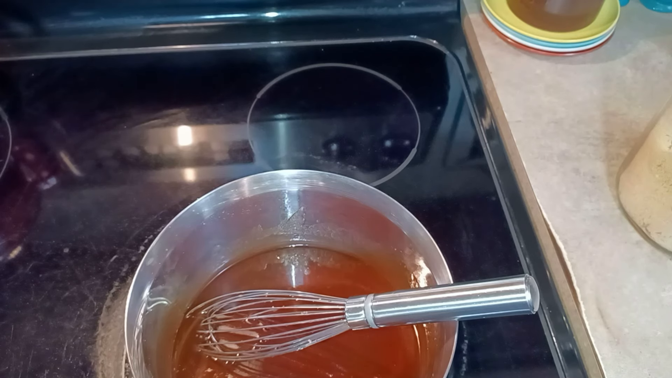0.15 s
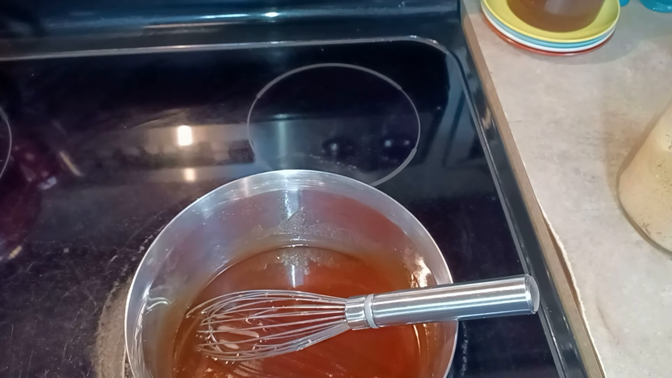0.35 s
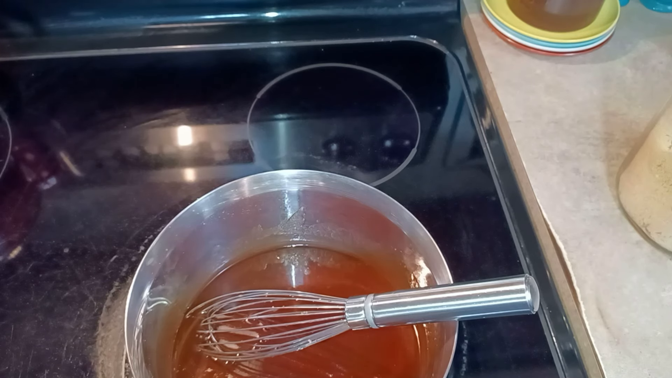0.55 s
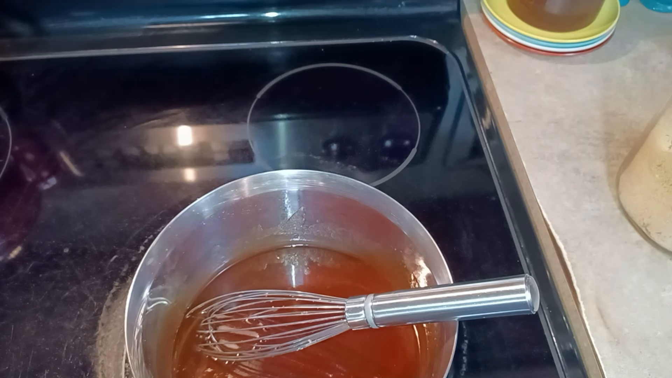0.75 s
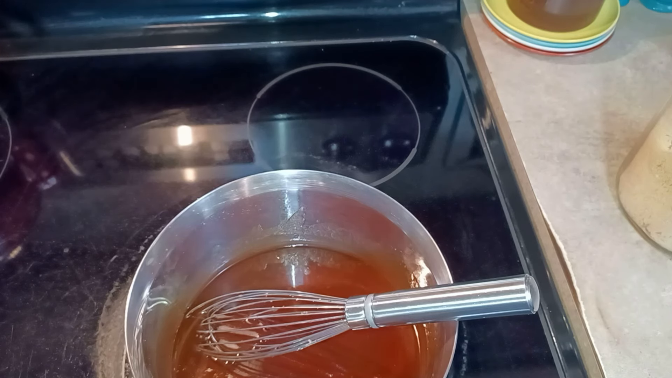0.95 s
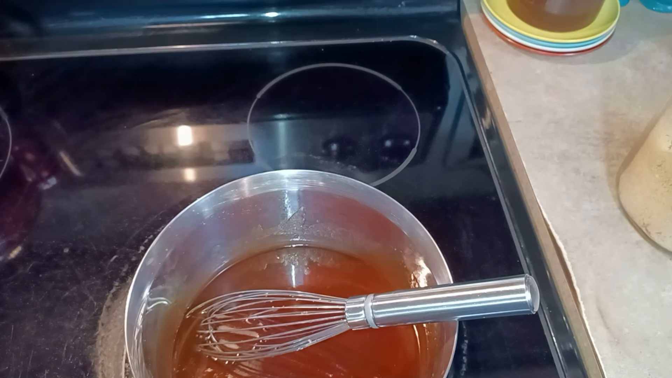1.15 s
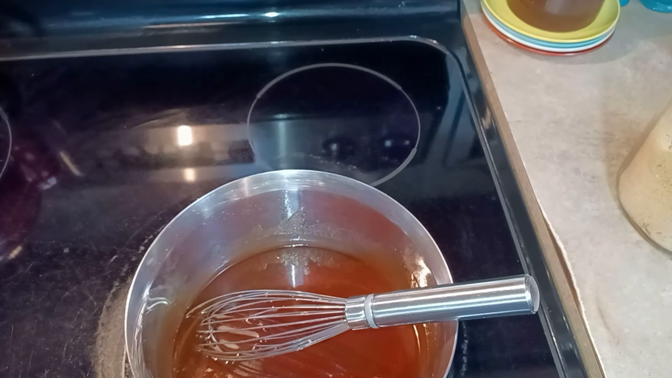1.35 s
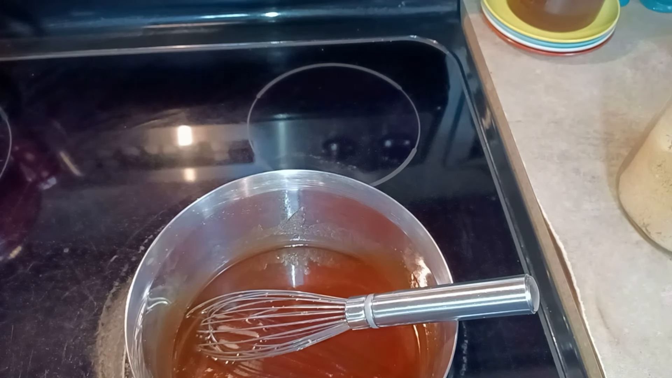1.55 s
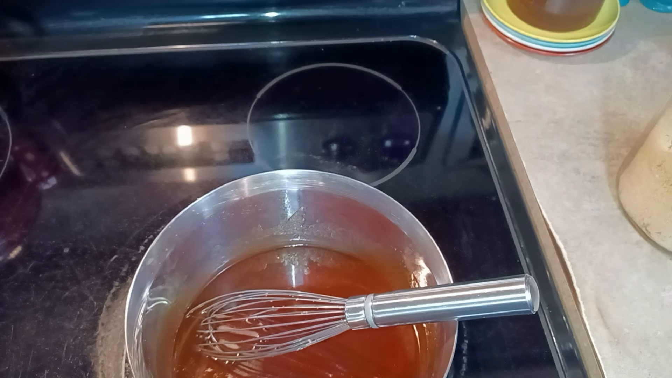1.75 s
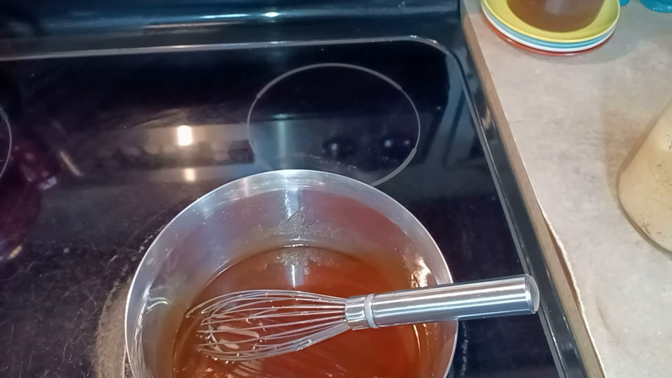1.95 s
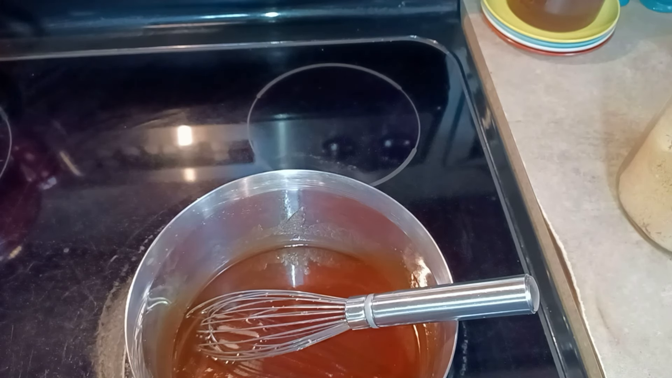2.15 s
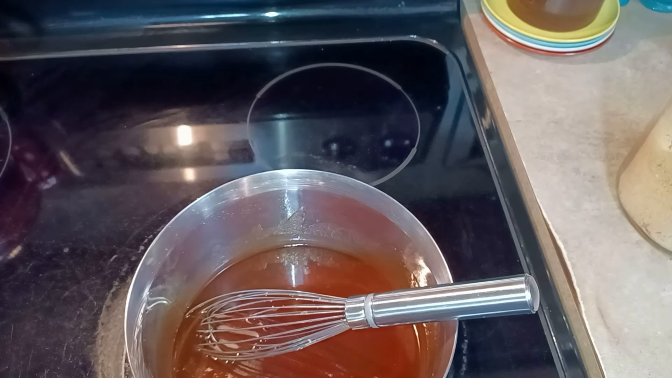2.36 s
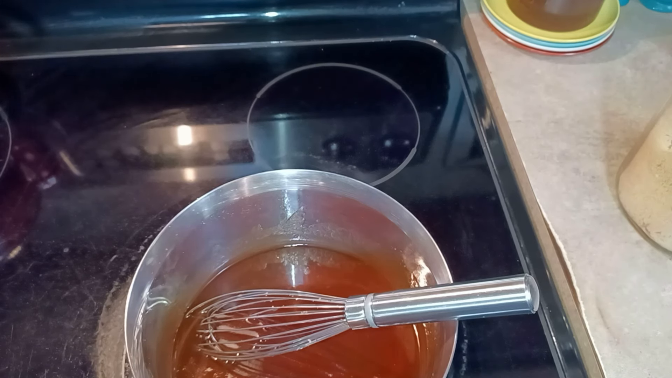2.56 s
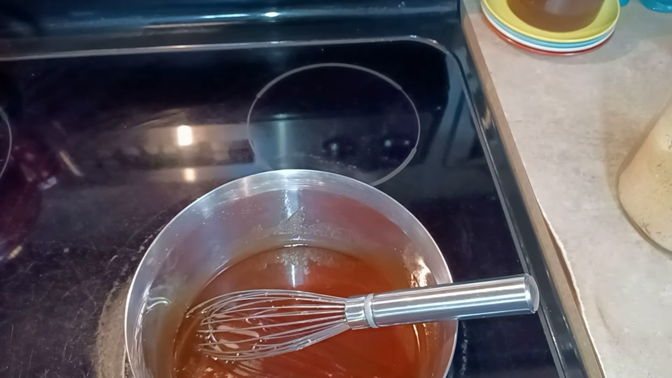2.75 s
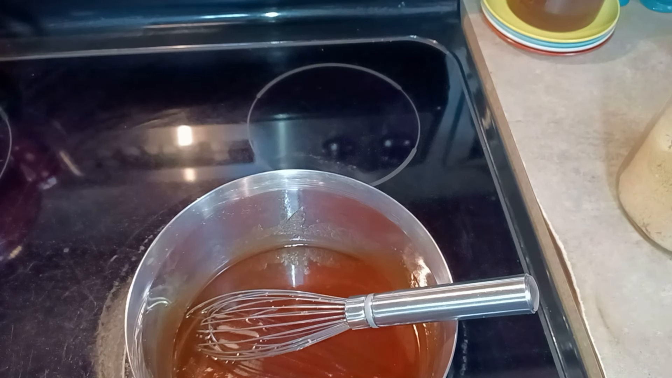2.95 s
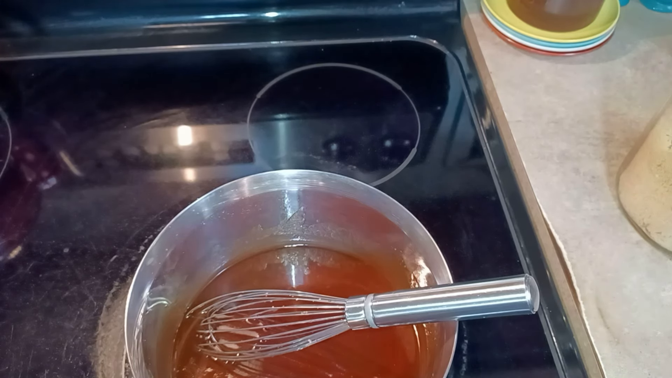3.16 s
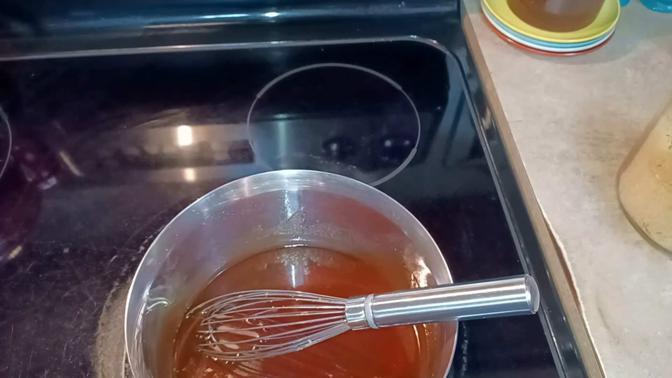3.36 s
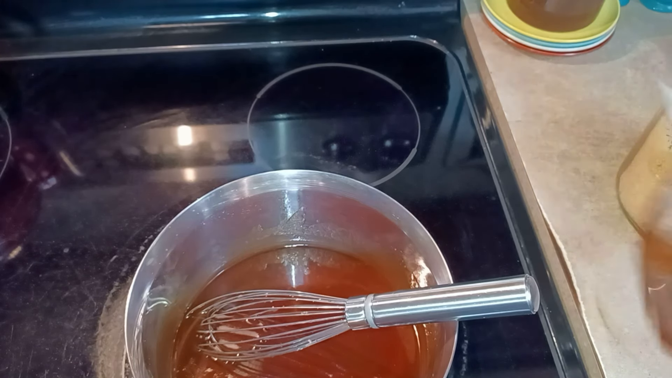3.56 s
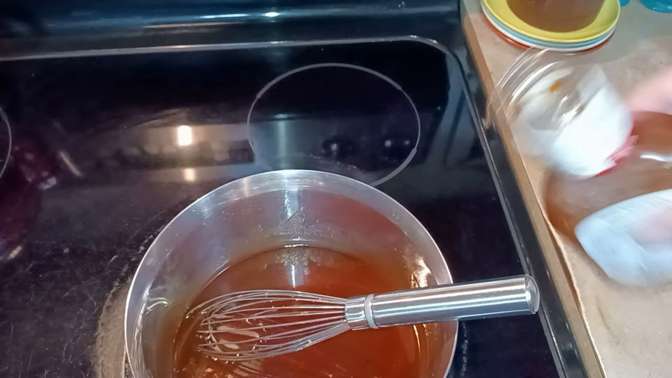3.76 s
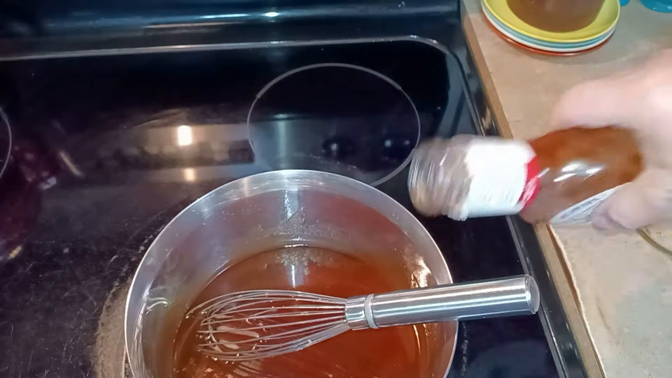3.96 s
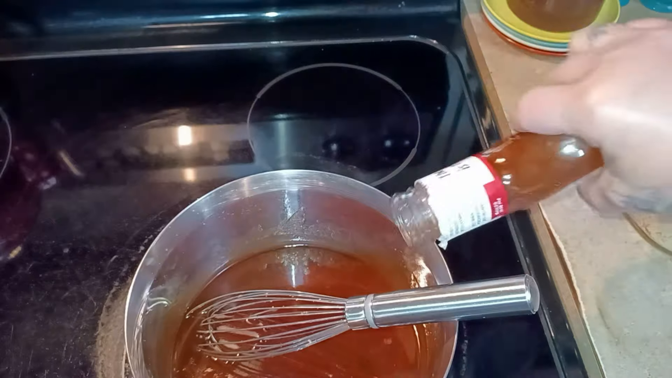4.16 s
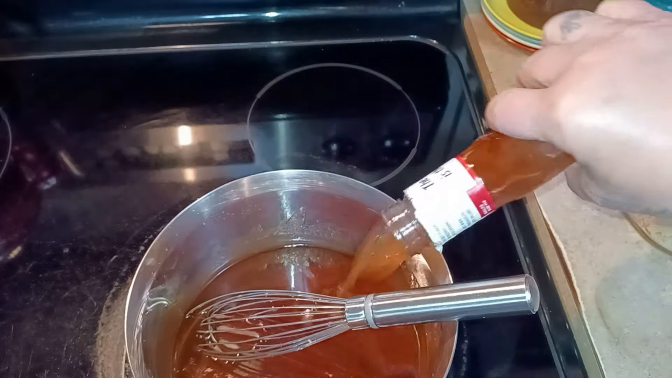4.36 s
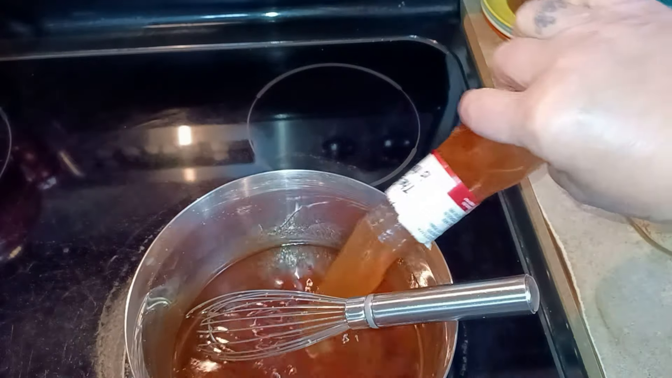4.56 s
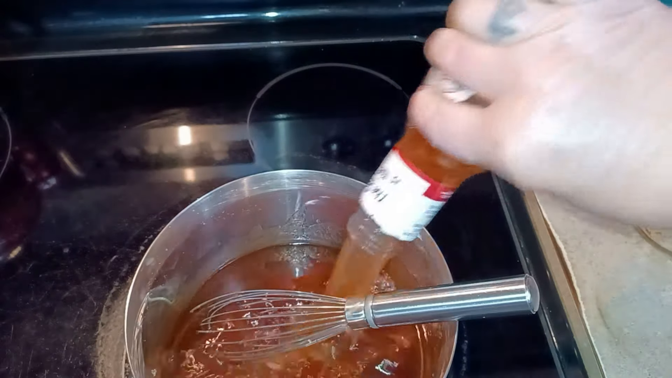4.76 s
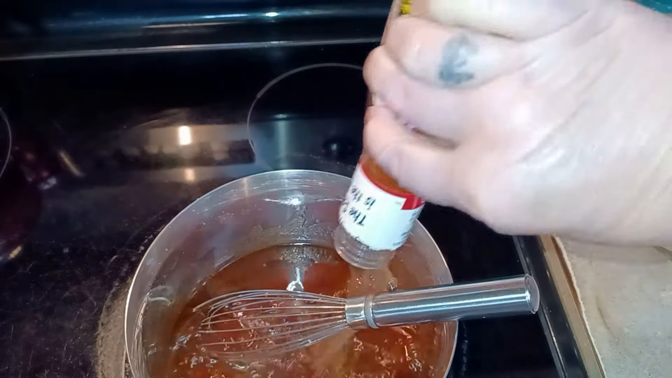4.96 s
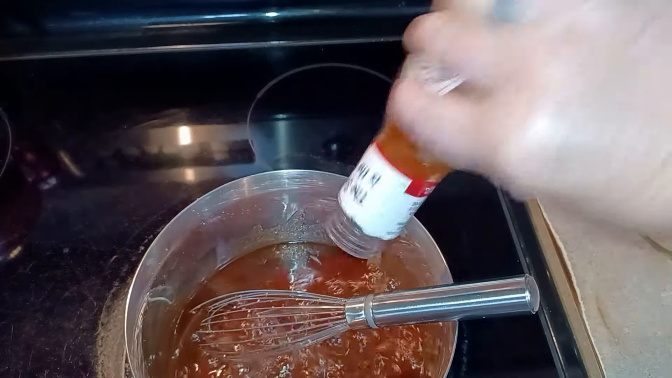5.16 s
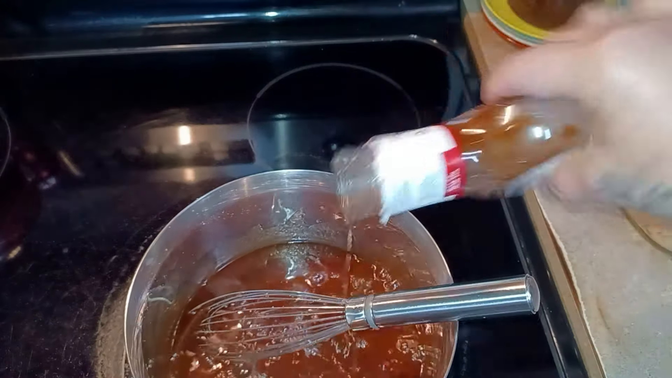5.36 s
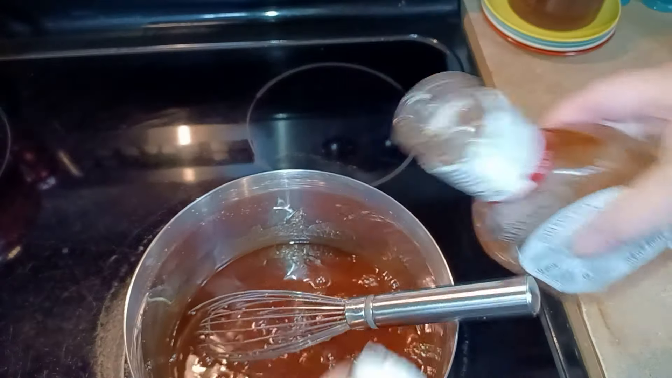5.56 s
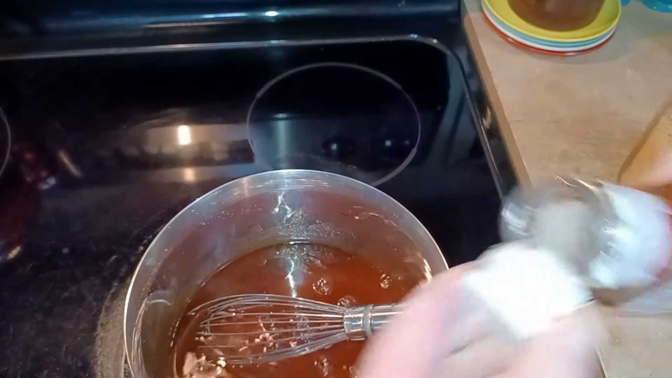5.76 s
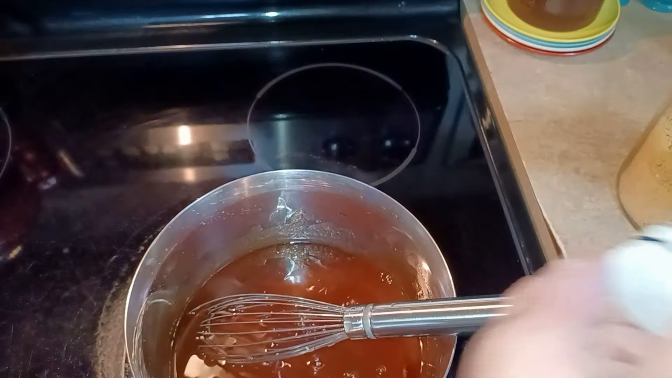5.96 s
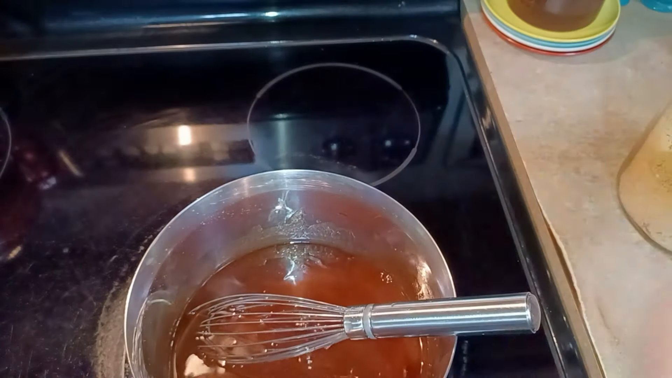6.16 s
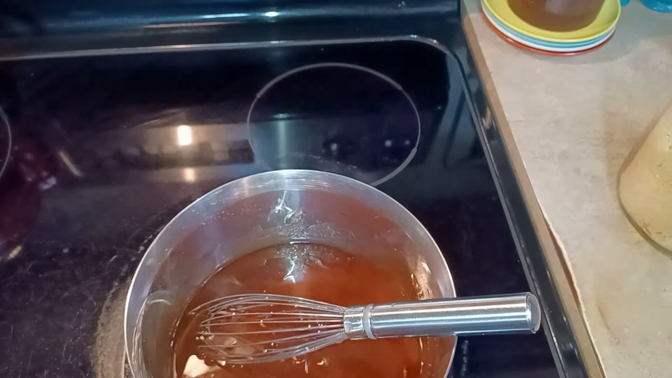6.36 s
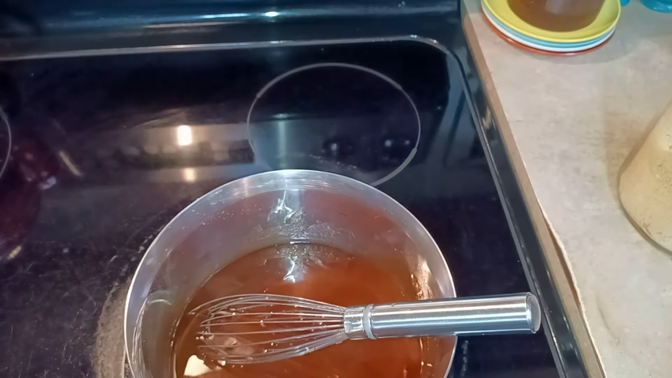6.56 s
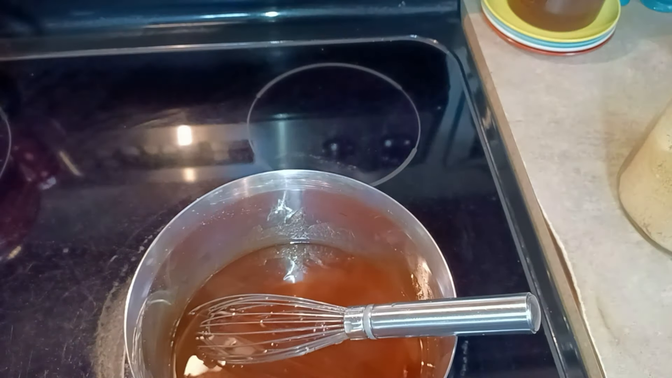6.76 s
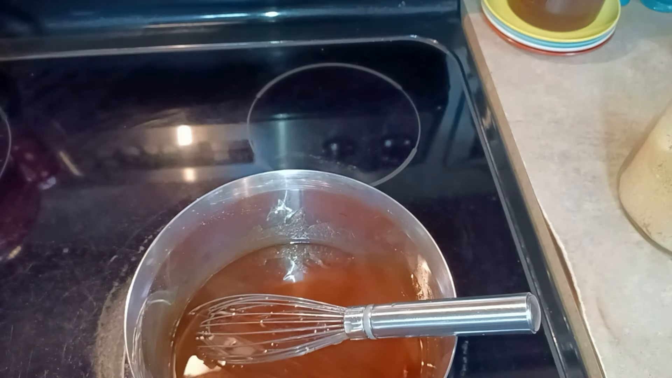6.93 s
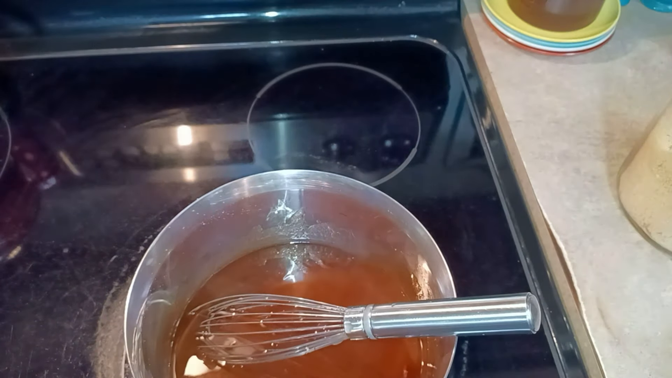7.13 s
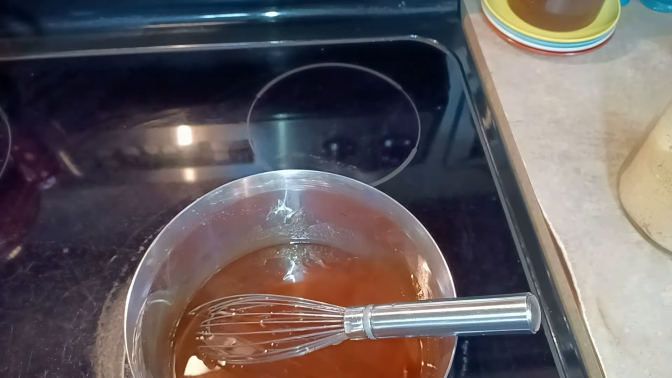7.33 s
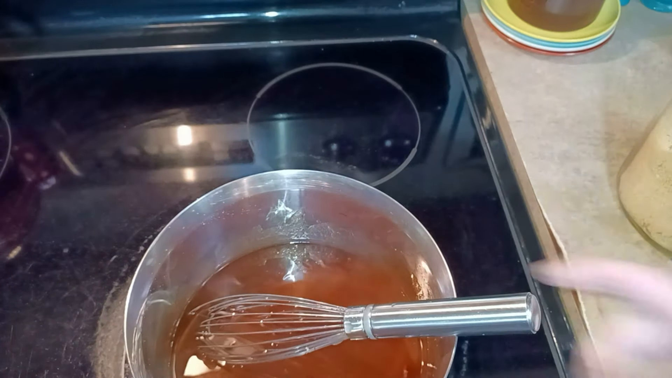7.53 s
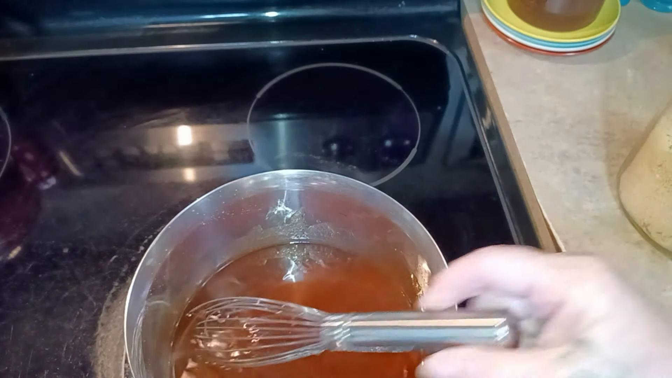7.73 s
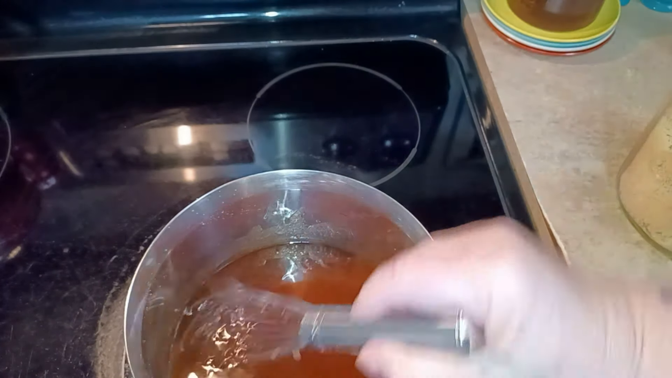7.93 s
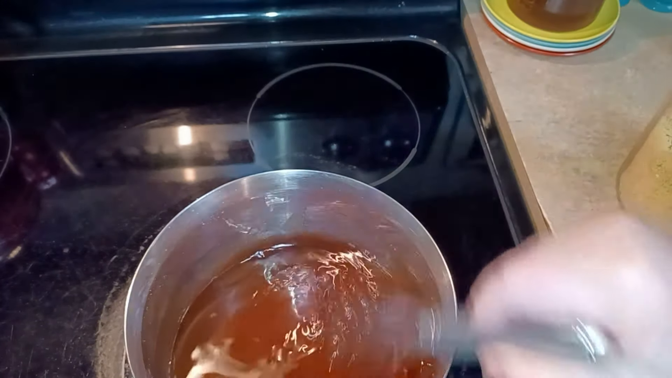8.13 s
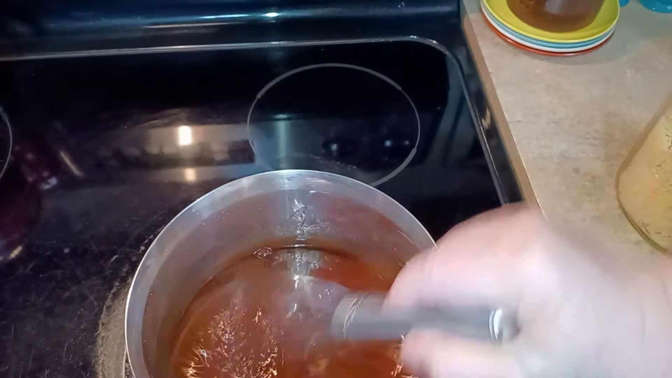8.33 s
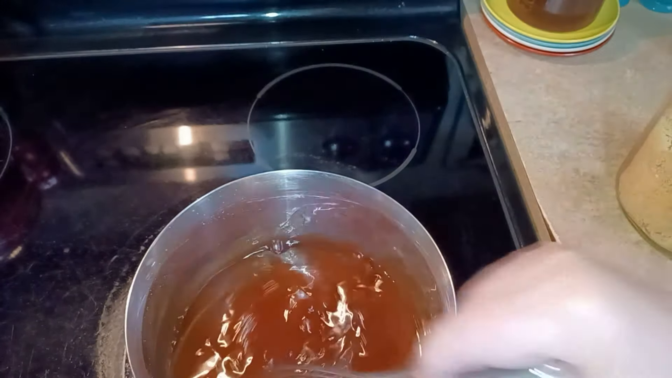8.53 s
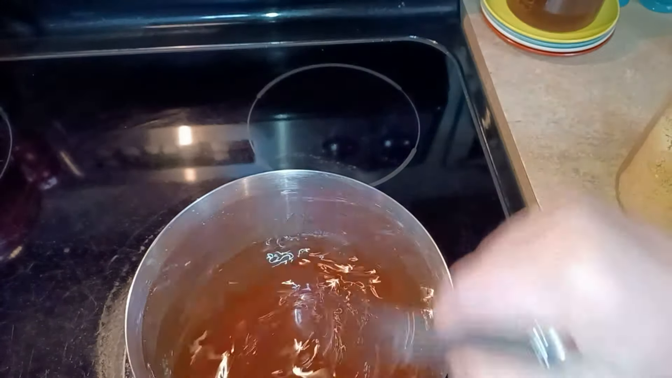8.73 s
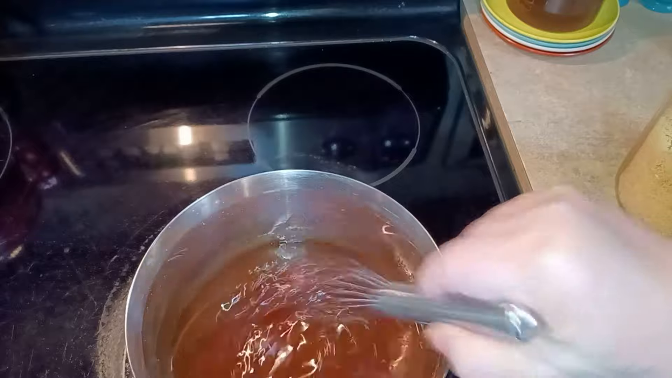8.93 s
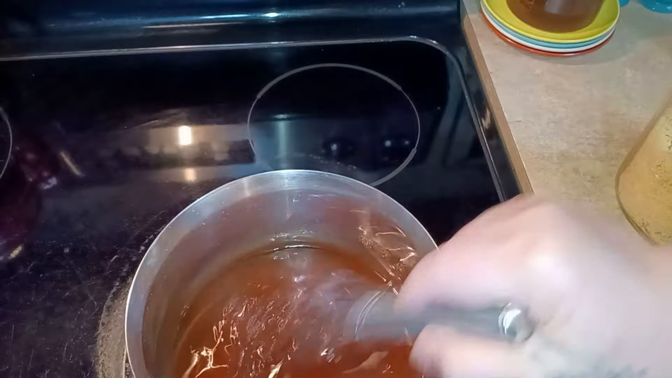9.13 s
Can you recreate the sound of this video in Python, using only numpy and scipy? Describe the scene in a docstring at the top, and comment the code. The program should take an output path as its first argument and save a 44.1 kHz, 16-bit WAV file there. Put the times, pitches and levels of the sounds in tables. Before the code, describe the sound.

A tap fills a plastic bottle, which is shaken and emptied into a steel saucepan, then a whisk stirs thin sauce.

```python
"""Rinsing a sauce bottle in the kitchen

Stereo pair in a small kitchen: sink far off, bottle to the left, steel saucepan straight ahead.
The tap runs, hisses into the plastic bottle, whose air whistles, and is shut off. The bottle is shaken
and emptied into the pan, all slaps and ringing bubbles, then capped and set down with hollow knocks.
A wire whisk starts to beat the thin sauce, steel slipping on steel. An appliance hums throughout."""
import sys
import numpy as np
from scipy import signal
from scipy.io import wavfile
from scipy.ndimage import uniform_filter1d

SR = 44100
rng = np.random.default_rng(int(sys.argv[2]) if len(sys.argv) > 2 else 0)


def master_out(mix):
    """Clip the mix to full scale and print it as 16-bit PCM to the path in sys.argv[1]."""
    frames = np.transpose(np.atleast_2d(mix))
    ceiling = np.clip(frames, -1, 1)
    pcm = np.round(ceiling * 32767).astype(np.int16)
    wavfile.write(sys.argv[1], SR, pcm)


N = 405279

# Levels in all tables are relative; each layer adds its own trim.
# spectrum of the tap's jet striking a surface: (frequency [Hz], level [dB])
JET_SPECTRUM = [(180, -13), (300, -9.5), (546, -11), (790, -16.5), (1400, -8), (2300, -8), (2930, -15),
                (3350, -8), (4600, -7), (5500, -10), (7100, -5), (8500, -9.5), (12300, -6), (15400, -5),
                (16500, -26)]
# liquid slapping the bottle's walls: (time [s], level [dB], main bubble [Hz], spray [dB])
BOTTLE_SLAPS = [(2.674, -37, 1604, -47), (2.742, -34, 1886, -55), (2.81, -40, 3200, -53),
                (2.875, -41, 4130, -36), (2.889, -36, 1600, -32.5), (2.923, -27.5, 1790, -47),
                (2.975, -32, 1720, -57), (3.02, -29.5, 1600, -36), (3.038, -34, 2200, -41),
                (3.099, -35, 3790, -48), (3.107, -31.5, 2310, -30), (3.129, -34, 2400, -45),
                (3.186, -40, 1620, -30.5), (3.2131, -24.5, 2060, -38), (3.223, -34, 2060, -45),
                (3.246, -29, 1450, -45), (3.261, -32.5, 1940, -28.5), (3.304, -29.5, 5200, -39),
                (3.324, -25.5, 1910, -27.5), (3.359, -27, 2200, -27.5), (3.392, -27, 1970, -33),
                (3.4131, -19.5, 2970, -20.5), (3.425, -26, 2330, -32), (3.469, -29, 1830, -29),
                (3.487, -26.5, 2960, -46), (3.505, -32.5, 2090, -47), (3.5469, -29, 1970, -28.5),
                (3.56, -32.5, 2390, -23), (3.647, -36, 4350, -35), (3.668, -28, 2540, -26),
                (3.683, -30.5, 2110, -42), (3.727, -34, 3200, -23.5), (3.77, -27.5, 1900, -48),
                (3.788, -25, 1470, -47), (3.7969, -20, 1990, -22), (3.819, -30, 1016, -43),
                (3.913, -26.5, 1800, -48), (3.93, -32, 2290, -45), (3.943, -26.5, 1890, -29),
                (3.975, -34, 1940, -47), (4.04, -33, 1490, -41)]
# turns of the whisk, each starting at the pan wall:
# (time [s], clash [dB], decay [s], pan rocking [dB], rocking pitch [Hz], pan ring [dB])
WHISK_STROKES = [(7.983, -32.5, 0.059, -28.5, 146, -59), (8.347, -29, 0.017, -28, 179, -57),
                 (8.6195, -23.5, 0.019, -29, 187, -52), (8.901, -23.5, 0.017, -25.5, 169.6, -41),
                 (9.157, -20.5, 0.026, -22, 159, -35)]


def shaking():
    """Liquid washes to and fro in the bottle and slaps its walls; water gurgles low in sink and bottle."""
    vigour = [(2.05, -66), (2.87, -45), (3.4, -43.5), (3.68, -38.5), (4.1, -60.5), (4.25, -84)]  # force of the shaking: (time [s], level [dB])
    spectrum = [(120, -46), (200, 10.5), (316, -0.5), (456, -2), (509, -18.5), (933, -16.5), (1350, -14),
                (1700, -8.5), (2000, -13.5), (2400, -17.5), (4200, -21.5), (6280, -21), (11100, -23),
                (13100, -21), (16000, -27)]  # liquid heard through plastic: (frequency [Hz], level [dB])
    gurgles = [(0.059, 0.069, 0.037, 0.25, -40.5), (1.369, 0.075, 0.019, 0.11, -37.5),
               (3.897, 0.25, 0.041, 0.11, -48)]  # low bubbling: (time [s], rise [s], hold [s], fall [s], level [dB])
    out = slaps(BOTTLE_SLAPS, spectrum, cycles=6.6, bubble_db=-3, cloud_db=-4, spray_db=-7,
                fizz_db=-11.5, tick_db=-7.5, smack_db=-9, fallback_db=-11.5)
    t, level = follow(vigour)
    add(out, t[0], level * churn(len(t), 299.6, 6110, per_s=1700, crackle_db=2, spectrum=spectrum))
    for row in gurgles:
        t, level = swell(*row)
        add(out, t[0], level * steadied(swarm(len(t), 326, 600, per_s=490, cycles=3, spread_db=3.5)))
    return out


def gulping(closing_db=-5):
    """Air pockets turn over in the bottle and ring low; the slap that closes each adds a higher note."""
    glugs = [(3.033, -18, 281), (3.482, -25, 305), (3.659, -14.5, 300), (3.798, -22, 316),
             (3.817, -24, 340)]  # large air pockets: (time [s], level [dB], pitch [Hz])
    out = np.zeros(N)
    # every slap in the bottle also gulps air
    gulps = [(s, db - 8.5, 324 * rng.uniform(0.704, 1.257)) for s, db, *_ in BOTTLE_SLAPS]
    for s, db, hz in glugs + gulps:
        add(out, s, amp(db) * peaked(bubble(hz, cycles=1.8, rise=0.0049)))
        add(out, s, amp(db + closing_db) * peaked(bubble(hz * 1.49, cycles=1.8, rise=0)))
    return out


def pouring(stream_db=-4, drum_db=-12):
    """The stream drives bubbles into the sauce and drums on the pan; a fine foam is left bursting."""
    flow = [(4.555, -48), (4.61, -51), (4.72, -32), (4.785, -27.5), (4.82, -32.5), (4.97, -33.5),
            (5.04, -35.5), (5.15, -89)]  # stream into the pan: (time [s], level [dB])
    spectrum = [(530, -29), (900, -14), (1220, -5), (1340, -6), (1570, -11), (2170, -2), (4010, -9),
                (4570, 2), (8250, -7.5), (12700, -5), (16000, -17.5)]  # liquid in the open pan: (frequency [Hz], level [dB])
    splashes = [(4.4368, -35, 2550, -41.5), (4.466, -30, 1314, -44), (4.487, -37, 2360, -42),
                (4.579, -34, 1260, -41), (4.597, -26.5, 1560, -33.5), (4.609, -26, 4940, -44),
                (4.6242, -28, 3740, -24.5), (4.64, -29, 2320, -44), (4.655, -30, 535, -44),
                (4.657, -26, 1730, -40), (4.679, -29, 1520, -26), (4.7436, -32, 1950, -25),
                (4.757, -19.5, 2010, -42), (4.7694, -16.5, 1383, -36), (4.7882, -15, 2100, -30.5),
                (4.842, -29, 1460, -42), (4.889, -22.5, 1550, -43), (4.902, -20.5, 1970, -46),
                (4.951, -23, 1650, -22), (4.976, -24, 813, -47), (5.001, -22.5, 1300, -50),
                (5.0235, -25.5, 763, -39), (5.066, -32.5, 3100, -26.5), (5.1358, -38, 3280, -43)]  # splashes in the pan: (time [s], level [dB], main bubble [Hz], spray [dB])
    # the pan rings once the stream digs in: (time [s], rise [s], hold [s], fall [s], level [dB])
    plunge = [(4.655, 0.057, 0.28, 0.082, -37.5)]
    foam = [(5.06, 0.084, 0.56, 0.47, -61)]  # bursting foam: (time [s], rise [s], hold [s], fall [s], level [dB])
    foam_spectrum = [(1180, -62), (2000, -25), (3200, -14.5), (5630, 0), (8260, -4), (13800, -6),
                     (16000, -10.5)]  # its fizz: (frequency [Hz], level [dB])
    out = slaps(splashes, spectrum, cycles=5.2, bubble_db=-5.5, cloud_db=-13.5, spray_db=-8,
                fizz_db=-25, tick_db=-3.5, smack_db=-16.5, fallback_db=-16)
    t, level = follow(flow)
    stream = churn(len(t), 1113, 4030, per_s=1200, crackle_db=0, spectrum=spectrum)
    add(out, t[0], amp(stream_db) * level * stream)
    drum_spectrum = [(50, -27), (100, -8), (160, 2.5), (260, 1.5), (500, -9), (1000, -18.5)]
    drum = colour(rng.standard_normal(len(t)), drum_spectrum)
    add(out, t[0], amp(drum_db) * level * evened(drum))
    t, level = swell(*plunge[0])
    add(out, t[0], level * pan_ring(len(t)) * clumps(len(t), per_s=47, depth_db=5.5))
    t, level = swell(*foam[0])
    add(out, t[0], level * steadied(colour(grit(len(t), per_s=840, spread_db=-2), foam_spectrum)))
    return out


def slaps(rows, spectrum, cycles, bubble_db, cloud_db, spray_db, fizz_db, tick_db, smack_db, fallback_db):
    """Each slap smacks, traps one large bubble and a cloud of small ones, throws spray and falls back."""
    rise_s, decay_s, smack_s, fallback_s = 0.00063, 0.015, 0.0024, 0.018
    smack_spectrum = [(500, -37), (1500, -2), (3800, 5.5), (6500, -3), (16000, -28)]
    spray_spectrum = [(1500, 0), (5000, 2), (9000, -9), (13000, 5.5), (16000, -5)]
    out, t = np.zeros(N), seconds(.06)
    fade = (1 - np.exp(-t / rise_s)) * np.exp(-(t / decay_s) ** 2)
    for s, db, hz, fine_db in rows:
        smack = colour(rng.standard_normal(len(t)) * np.exp(-t / smack_s), smack_spectrum)
        add(out, s, amp(fine_db + tick_db) * tick())
        add(out, s, amp(db + smack_db) * peaked(smack))
        for at, gain, pitch in [(s, 1, hz), (s + fallback_s, amp(fallback_db), hz * 0.88)]:
            cloud = colour(fade * swarm(len(t), 524, 6150, per_s=1700, cycles=2.1, spread_db=32.5), spectrum)
            drops = grit(len(t), per_s=1800, spread_db=2.5) * clumps(len(t), per_s=400, depth_db=5)
            spray = colour(fade * drops, spray_spectrum)
            fizz = fade * swarm(len(t), 6500, 15500, per_s=1400, cycles=10, spread_db=16)
            mist = amp(spray_db) * peaked(spray) + amp(fizz_db) * peaked(fizz)
            add(out, at, gain * amp(db + bubble_db) * peaked(bubble(pitch, cycles, rise=0.011)))
            add(out, at, gain * amp(db + cloud_db) * peaked(cloud))
            add(out, at, gain * amp(fine_db) * mist)
    return out


def churn(count, low_hz, high_hz, per_s, crackle_db, spectrum):
    """Churned liquid: larger bubbles ring, the finest spray only crackles."""
    drops = grit(count, per_s=1200, spread_db=6)
    crackle = colour(drops, [(1000, -13), (3000, -9), (6000, 0), (16000, 0)])
    bubbles = swarm(count, low_hz, high_hz, per_s=per_s, cycles=8, spread_db=18)
    return steadied(colour(bubbles + amp(crackle_db) * crackle, spectrum))


def bubble(hz, cycles, rise):
    """A bubble rings for some cycles and rises in pitch as it nears the surface."""
    t = seconds(6 * cycles / hz)
    age = t * hz / cycles
    return np.sin(2 * np.pi * hz * t * (1 + rise * age)) * np.exp(-age) * (1 - np.exp(-2 * hz * t))


def swarm(length, low_hz, high_hz, per_s, cycles, spread_db):
    """A steady crowd of bubbles of all sizes with a level spectrum."""
    out = np.zeros(length)
    draws = np.random.default_rng(rng.integers(2 ** 31)).random((int(per_s * length / SR), 4))
    for at, pitch, size, damping in draws:
        hz = low_hz * (high_hz / low_hz) ** pitch
        ring = bubble(hz, cycles * (.5 + damping), rise=0.018)
        add(out, at * length / SR, hz * amp(spread_db * size ** 2) * ring)
    return evened(out)


def filling(neck_db=-13, jet_db=-1, hollow_db=-3, upper_width_hz=180, lower_width_hz=380):
    """The jet rasps in the bottle's neck and sounds two air resonances that wander as it shifts."""
    force = [(0.965, -72), (0.995, -39.5), (1.11, -29.5), (1.19, -31.5), (1.27, -28), (1.305, -27),
             (1.425, -25), (1.48, -42), (1.65, -63.5)]  # jet entering the bottle: (time [s], level [dB])
    neck_modes = [(7037, 21, -3), (6900, 40, -9.5), (9600, 47, 7), (11600, 20, 7), (13100, 58, -2)]  # resonances of the neck: (frequency [Hz], width [Hz], level [dB])
    # air resonances against the hiss: (time [s], lower [Hz], lower [dB], upper [Hz], upper [dB])
    cavity = [(1.0, 1800, -2, 2500, -9.5), (1.07, 1680, -12.5, 3110, -6), (1.105, 1320, -13.5, 3800, -5.5),
              (1.135, 1310, -18.5, 3630, -3), (1.185, 1350, -20.5, 3870, 1.5), (1.21, 1370, -14, 3660, -4),
              (1.275, 1620, -22.5, 3660, 0), (1.295, 1850, -12, 4330, 2), (1.319, 1750, -5.5, 3330, -3.5),
              (1.36, 1660, -8.5, 3210, -1.5), (1.395, 1640, -8, 3800, -11), (1.47, 1300, -4, 3620, -24)]
    overtones = [(1, -4.5), (2, 1), (3, 3), (4, 1.5)]  # partials of the upper resonance: (multiple, level [dB])
    out = np.zeros(N)
    t, level = follow(force)
    drops = grit(len(t), per_s=16000, spread_db=1.5) * clumps(len(t), per_s=600, depth_db=0)
    s, *tracks = np.transpose(cavity)
    lower, lower_db, upper, upper_db = (np.interp(t, s, track) for track in tracks)
    whistle = evened(sum(amp(db) * sung(drops, k * upper, upper_width_hz * np.sqrt(k))
                         for k, db in overtones))
    hollow = amp(lower_db + hollow_db) * sung(drops, lower, lower_width_hz)
    rasp = evened(colour(drops, JET_SPECTRUM)) + amp(neck_db) * ringing(drops, neck_modes)
    add(out, t[0], amp(jet_db) * level * (rasp + amp(upper_db) * whistle + hollow))
    return out


def tap(spatter_db=-1, whistle_db=-13):
    """Aerated water hisses into the sink, with a thin whistle from the spout."""
    spectrum = [(150, -10), (250, 4.5), (268, -12.5), (308, -4.5), (460, -7), (597, -8.5), (761, -16),
                (1380, -5.5), (2020, -4.5), (2910, -13.5), (6040, -13.5), (8700, -20), (15200, -10.5),
                (16000, -22.5)]  # water in the sink: (frequency [Hz], level [dB])
    spatters = [(0.002, -30), (0.0383, -32), (0.0852, -28.5), (0.123, -27)]  # spray striking the sink: (time [s], level [dB])
    out = np.zeros(N)
    t, level = swell(0, rise=0, hold=1.0, fall=0.15, db=-45)
    spray = evened(colour(grit(len(t), per_s=14000, spread_db=3), spectrum))
    whistle = evened(resonate(rng.standard_normal(len(t)), hz=15350, width=220))
    add(out, t[0], level * (spray + amp(whistle_db) * whistle))
    t = seconds(0.15)
    for s, db in spatters:
        burst = colour(grit(len(t), per_s=9100, spread_db=-6), JET_SPECTRUM) * np.exp(-t / 0.03)
        add(out, s, amp(db + spatter_db) * peaked(burst))
    return out


def knocking(thud_swell_s=0.0029, rattle_s=0.048, rattle_db=-18.5):
    """Bottle and cap knock: the soft wall gives with a thud, the plastic cracks, rings and chatters on."""
    # knocks: (time [s], thud [dB], thud [Hz], hollow ring [dB], most excited [Hz],
    #          clack [dB], clack [Hz], tick [dB])
    knocks = [(5.624, -15, 250, -28, 930, -24, 1510, -24), (5.636, -25, 232, -31, 720, -34, 1750, -50),
              (5.875, -39, 245, -59, 715, -47, 2870, -34.5),
              (5.941, -29.5, 255, -39, 715, -31.5, 3460, -30.5),
              (6.035, -26, 252, -42, 715, -40, 2300, -37), (6.0814, -34.5, 410, -33, 720, -26.5, 3100, -38),
              (6.396, -44, 247, -51, 715, -40, 1840, -64), (6.8226, -13.5, 217, -20, 509, -27, 2450, -25),
              (6.868, -19.5, 167, -20, 710, -21, 1980, -38.5), (6.875, -37, 170, -47, 715, -41, 2100, -45),
              (6.9, -38, 200, -36, 715, -33, 1300, -52), (6.936, -28, 170, -29.5, 715, -39.5, 4200, -37),
              (6.948, -41, 202, -41, 715, -39.5, 2400, -40.5)]
    modes = [(503, 4.5, 0.065), (717, 7.5, 0.025), (1005, 6.5, 0.032), (1274, 17, 0.02), (1760, 5.5, 0.046),
             (2034, 13.5, 0.019), (2340, 1, 0.024), (2920, -2.5, 0.019), (4280, -6.5, 0.018)]  # ring of the bottle: (frequency [Hz], level [dB], t60 [s])
    rattle_spectrum = [(500, -18), (2200, 11), (5000, -13), (9000, -13), (16000, -13)]
    out, t = np.zeros(N), seconds(0.41)
    for s, thud_db, thud_hz, hollow_db, focus_hz, clack_db, clack_hz, tick_db in knocks:
        contact = rng.standard_normal(len(t)) * np.exp(-t / 0.0023)
        thud = t * np.exp(-t / thud_swell_s) * np.sin(2 * np.pi * thud_hz * t)
        # the three lowest modes give the hollow note, the rest the clack
        hollow = struck(modes[:3], focus_hz, t) * (1 - np.exp(-t / 0.00015))
        rattle = grit(len(t), per_s=1500, spread_db=-0.5) * np.exp(-t / rattle_s)
        clack = (peaked(struck(modes[3:], clack_hz, t))
                 + 0.48 * peaked(resonate(contact, clack_hz, width=740))
                 + amp(rattle_db) * peaked(colour(rattle, rattle_spectrum)))
        crack = colour(contact, [(1000, 10), (3500, 1), (7000, -4), (16000, -48)])
        add(out, s, amp(thud_db - 3) * peaked(thud))
        add(out, s, amp(hollow_db) * peaked(hollow) + amp(clack_db - 1) * peaked(clack))
        add(out, s, amp(hollow_db - 9) * peaked(crack))
        add(out, s, amp(tick_db - 9) * tick())
    return out


def struck(modes, focus_hz, t, db_per_octave=21):
    """Where the bottle is struck picks its note: the modes near focus_hz ring most."""
    return sum(amp(db - db_per_octave * abs(np.log2(hz / focus_hz)) - 60 * t / t60)
               * np.sin(2 * np.pi * (hz * t + rng.random())) for hz, db, t60 in modes)


def rubbing(rub_db=-4):
    """Plastic rubs in the hand, and scuffs dully as the bottle is turned and lowered."""
    rubs = [(5.862, 0.017, 0.039, 0.06, -46.5), (6.011, 0.025, 0.048, 0.016, -32.5),
            (6.163, 0.088, 0.2, 0.15, -43.5), (7.532, 0.059, 0.041, 0.22, -51)]  # hand on plastic: (time [s], rise [s], hold [s], fall [s], level [dB])
    rub_spectrum = [(180, -38), (300, 7), (425, -30), (528, -3), (1140, -5), (1340, -4.5), (1900, -4.5),
                    (8360, -25.5), (13500, -31), (16000, -44)]  # its friction noise: (frequency [Hz], level [dB])
    scuffs = [(5.801, 0.086, 0.05, 0.32, -42.5), (6.479, 0.2, 0.325, 0.051, -49),
              (7.54, 0.05, 0.044, 0.12, -54)]  # dull scuffs: (time [s], rise [s], hold [s], fall [s], level [dB])
    scuff_spectrum = [(200, -8.5), (480, -3), (800, -16.5), (2000, -30), (8000, -47)]
    out = np.zeros(N)
    for row in rubs:
        t, level = swell(*row)
        friction = colour(grit(len(t), per_s=6800, spread_db=2.5), rub_spectrum)
        add(out, t[0], amp(rub_db) * level * evened(friction))
    for row in scuffs:
        t, level = swell(*row)
        friction = colour(grit(len(t), per_s=2000, spread_db=-1.5), scuff_spectrum)
        add(out, t[0], level * evened(friction))
    return out


def whisking(clash_db=-2, rise_s=0.0049, hold_s=0.0084, pan_hz=824, drag_db=-54):
    """Each turn clashes the wires against the wall, then swishes them over the floor, which sings."""
    # wires over the pan floor: (time [s], rise [s], hold [s], fall [s], level [dB], pan singing [dB])
    sweeps = [(7.999, 0.013, 0.044, 0.15, -50, -49.5), (8.183, 0.03, 0.016, 0.12, -38, -47),
              (8.401, 0.021, 0.017, 0.44, -42.5, -56.5), (8.473, 0.049, 0.026, 0.13, -38, -48.5),
              (8.654, 0.034, 0.022, 0.25, -41, -56), (8.778, 0.028, 0.034, 0.11, -40.5, -42.5),
              (8.933, 0.016, 0.013, 0.12, -36.5, -43.5), (9.006, 0.049, 0.03, 0.16, -36.5, -42)]
    out, t = np.zeros(N), seconds(0.38)
    for s, db, decay, _, _, ring_db in WHISK_STROKES:
        level = np.minimum(t / rise_s, 1) * np.exp(-np.maximum(t - hold_s, 0) / decay)
        clash = amp(db + clash_db) * wires(len(t), ring_db=-9)
        add(out, s, level * (clash + amp(ring_db) * pan_ring(len(t))))
    for *shape, db, song_db in sweeps:
        t, level = swell(*shape, db=0)
        song = sung(rng.standard_normal(len(t)), pan_hz, width=53)
        add(out, t[0], level * (amp(db) * wires(len(t), ring_db=4.5) + amp(song_db) * song))
    start = WHISK_STROKES[0][0]  # from here on the wires drag faintly
    add(out, start, amp(drag_db) * wires(N - round(start * SR), ring_db=-6))
    return out


def wires(count, ring_db, flex=0.045):
    """Steel catches and slips on steel in spurts and rings the loops, bent a little differently each time."""
    spectrum = [(240, -8), (400, -9.5), (666, -10.5), (814, -14), (1150, -13.5), (2710, -12.5),
                (3100, -4.5), (3930, -10.5), (5870, -4.5), (8200, -8.5), (11500, -10.5), (14100, -10.5),
                (16000, -22)]  # scrape of steel: (frequency [Hz], level [dB])
    loops = [(1470, 49, 0), (2430, 47, 7.5), (3040, 43, -1), (3600, 26, -2), (4550, 38, 4), (5900, 52, 2),
             (6350, 71, 4), (7420, 140, -4.5), (8150, 150, -6), (9940, 80, 2), (11100, 97, 3),
             (12700, 150, 7), (13800, 250, 5.5), (14600, 120, -8)]  # ring of the wire loops: (frequency [Hz], width [Hz], level [dB])
    slips = grit(count, per_s=3700, spread_db=3) * clumps(count, per_s=280, depth_db=5.5)
    flexed = [(hz * (1 + flex * rng.standard_normal()), width, db) for hz, width, db in loops]
    return evened(evened(colour(slips, spectrum)) + amp(ring_db) * ringing(slips, flexed))


def pan_ring(count):
    """The pan rings under a hail of tiny blows."""
    modes = [(713, 74, 2.5), (817, 48.4, 0.5), (1123, 54, -5.5), (1320, 110, -1), (1922, 60, 0),
             (2133, 61, -9)]  # ring of the pan: (frequency [Hz], width [Hz], level [dB])
    blows = grit(count, per_s=1500, spread_db=-1)
    return evened(sum(amp(db) * sung(blows, hz, width) for hz, width, db in modes))


def sloshing(slosh_db=-2, stir_db=-56, swell_s=0.0069, pitch_spread=1.14):
    """The whisk folds air into the sauce: soft clusters of bubbles over a faint steady stir."""
    sloshes = [(8.094, -46, 1520), (8.127, -42.5, 1060), (8.201, -43.5, 1410), (8.308, -43, 1500),
               (8.464, -42, 1300), (8.491, -38.5, 2920), (8.531, -36, 2360), (8.55, -39, 1890),
               (8.715, -23.5, 3000), (8.72, -35, 1700), (8.965, -38, 980), (9.028, -36.5, 1920),
               (9.088, -35, 2070)]  # sauce through the wires: (time [s], level [dB], pitch [Hz])
    out, t = np.zeros(N), seconds(0.064)
    for s, db, hz in sloshes:
        cluster = swarm(len(t), hz / pitch_spread, hz * pitch_spread, per_s=1200, cycles=4.7, spread_db=22)
        add(out, s, amp(db + slosh_db) * peaked(hump(t, swell_s) * cluster))
    start = WHISK_STROKES[0][0]
    stir = swarm(N - round(start * SR), 930, 2790, per_s=500, cycles=8.8, spread_db=2)
    add(out, start, amp(stir_db) * stir)
    return out


def bumps(thump_db=-19, thump_hz=88, rock_lag_s=0.0044, rock_swell_s=0.0084):
    """Heavy things pushed softly, like the pan at each stroke: a low tone swells over a deeper thump."""
    # the tap closing and the whisk being gripped: (time [s], level [dB], pitch [Hz], swell [s])
    pushes = [(1.437, -30, 128, 0.0097), (1.443, -32.5, 240, 0.0083), (7.69, -37.5, 143, 0.016)]
    out, t = np.zeros(N), seconds(.3)
    rocking = [(s + rock_lag_s, db, hz, rock_swell_s) for s, _, _, db, hz, _ in WHISK_STROKES]
    for s, db, hz, rise in pushes + rocking:
        add(out, s, amp(db) * peaked(hump(t, rise) * np.sin(2 * np.pi * hz * t)))
        add(out, s, amp(db + thump_db) * peaked(bubble(thump_hz, cycles=4.3, rise=0)))
    return out


def dripping(bubble_db=-2, impact_db=-15):
    """Each drip is a tiny impact and one ringing bubble."""
    drips = [(2.066, -44, 2534), (2.195, -40, 2480), (2.388, -37.5, 5310), (2.615, -34, 4314),
             (4.0835, -33.5, 3081)]  # single drips: (time [s], level [dB], pitch [Hz])
    out = np.zeros(N)
    for s, db, hz in drips:
        add(out, s, amp(db + bubble_db) * peaked(bubble(hz, cycles=24, rise=0.0026)))
        add(out, s, amp(db + impact_db) * peaked(bubble(hz * 2.4, cycles=0.66, rise=.01)))
    return out


def ticks(trim_db=-9):
    """Droplets and plastic tick in the quiet."""
    strays = [(2.341, -43), (5.431, -43.5), (7.1138, -52.5), (7.451, -51), (7.813, -44), (7.977, -42)]  # stray ticks: (time [s], level [dB])
    out = np.zeros(N)
    for s, db in strays:
        add(out, s, amp(db + trim_db) * tick())
    return out


def tick():
    """A very short bright click."""
    t = seconds(0.02)
    burst = rng.standard_normal(len(t)) * np.exp(-t / 0.00089)
    return peaked(colour(burst, [(500, -42), (2000, -20), (6000, 7.5), (16000, 0.5)]))


def appliance(rush_db=-49, left_db=2):
    """Room tone: mains hum and the soft rush of an appliance, alike at both microphones in the bass."""
    spectrum = [(15, -78.5), (25, -44), (42, -28.5), (82, -12.5), (123, -0.5), (175, -18), (242, -4),
                (463, -22.5), (575, -33), (936, -33.5), (1070, -37), (1160, -39.5), (5140, -56),
                (12200, -54.5), (16000, -56)]  # rush of the appliance: (frequency [Hz], level [dB])
    hum_lines = [(60, -66.5), (120, -54), (241, -59)]  # mains hum: (frequency [Hz], level [dB])
    shared, *sides = rng.standard_normal((3, N))
    side_spectrum = [(100, -8), (250, -6.5), (600, 3.5), (2000, 6.5)]
    rush = np.array([colour(shared + colour(side, side_spectrum), spectrum) for side in sides])
    t = np.arange(N) / SR
    hum = sum(amp(db) * np.sqrt(2) * np.sin(2 * np.pi * (hz * t + rng.random())) for hz, db in hum_lines)
    return (amp(rush_db) * evened(rush) + hum) * amp([[left_db / 2], [-left_db / 2]])


def kitchen(x, lag_ms, left_db, early_db, tail_db, near_db=-30, hop=4400):
    """Direct sound, lag_ms later at the right microphone, and echoes that change as hand and liquid move."""
    direct = np.array([x, np.roll(x, round(lag_ms * SR / 1000))])
    padded, window = np.pad(x, (hop, 2 * hop)), signal.windows.cosine(2 * hop)
    wet = np.zeros((2, len(padded)))
    for at in range(0, N + hop, hop):
        piece = padded[at:at + 2 * hop] * window
        if abs(piece).max() > 1e-5:
            echoes = signal.fftconvolve(piece[None], reflections(near_db, early_db, tail_db), axes=1)
            for channel, echo in zip(wet, echoes):
                add(channel, at / SR, echo)
    total = np.sqrt(1 + np.sum(amp([near_db, early_db, tail_db]) ** 2) / 2)
    return (direct + wet[:, hop:hop + N]) * amp([[left_db / 2], [-left_db / 2]]) / total


def reflections(near_db, early_db, tail_db):
    """One random set of echoes at the pair: vessel walls, hob and counter, then the room."""
    reverb_times = [(150, 0.45), (600, 0.35), (2000, 0.26), (6000, 0.29), (15000, 0.22)]  # decay of the room: (frequency [Hz], t60 [s])
    t = seconds(.36)
    taps = rng.standard_normal((2, len(t))) * (rng.random((2, len(t))) < .2)
    hz, frame_s, bands = signal.stft(taps * (1 - np.exp(-t / 0.0046)), SR, nperseg=256)
    decay = amp(-60 * frame_s / read(reverb_times, hz)[:, None])
    tail = signal.istft(bands * decay, SR, nperseg=256)[1][:, :len(t)]
    near = rng.standard_normal(taps.shape) * np.exp(-t / 0.0014)
    early = taps[:, ::-1] * np.exp(-t / 0.0059) * (t > .0007)
    near, early, tail = (amp(db) * part / np.linalg.norm(part, axis=1, keepdims=True)
                         for db, part in [(near_db, near), (early_db, early), (tail_db, tail)])
    # small surfaces return only short waves; long waves reach both microphones alike
    echo = signal.lfilter(*signal.butter(1, 800, "high", fs=SR), near + early) + tail
    echo[1] += signal.lfilter(*signal.butter(1, 350, fs=SR), echo[0] - echo[1])
    return echo


def grit(count, per_s, spread_db):
    """Random clicks of uneven size."""
    size = amp(spread_db * np.minimum(rng.exponential(1, count), 3)) * rng.standard_normal(count)
    return evened(size * (rng.random(count) < per_s / SR))


def clumps(count, per_s, depth_db):
    """A gain that jumps about at random, bunching clicks into spurts."""
    at = np.arange(count) * per_s / SR
    steps = np.random.default_rng(rng.integers(2 ** 31)).uniform(-1, 1, int(at[-1]) + 2)
    return evened(amp(depth_db * np.interp(at, np.arange(len(steps)), steps)))


def colour(x, spectrum, size=4096):
    """Causal filter that keeps attacks sharp; spectrum is (frequency [Hz], level [dB])."""
    hz = abs(np.fft.fftfreq(size, 1 / SR))
    log_gain = np.log(amp(np.maximum(read(spectrum, hz), -100)))
    taps = np.fft.ifft(np.exp(np.conj(signal.hilbert(log_gain)))).real[:size // 2]
    return signal.oaconvolve(x, taps)[:len(x)]


def resonate(x, hz, width):
    """A resonance of gain 1, steady or moving."""
    turn = np.exp(2j * np.pi * np.cumsum(hz * np.ones(len(x))) / SR)
    pole = np.exp(-np.pi * width / SR)
    return 2 * (turn * signal.lfilter([1 - pole], [1, -pole], x / turn)).real


def ringing(x, peaks):
    """A bank of resonances."""
    return evened(sum(amp(db) * resonate(x, hz, width) for hz, width, db in peaks))


def sung(x, hz, width):
    """A steep resonance at an even level: noise becomes a fuzzy whistle."""
    return steadied(resonate(resonate(x, hz, width), hz, width))


def follow(rows):
    """The times a dB curve spans, and its gain with soft ends."""
    s, db = np.transpose(rows)
    t = np.arange(max(s[0], 0), s[-1], 1 / SR)
    ends = np.clip(np.minimum(t - t[0], t[-1] - t) / .004, 0, 1)
    return t, ends * amp(np.interp(t, s, db))


def swell(s, rise, hold, fall, db, depth_db=35):
    """Attack, hold and release, as times and gains."""
    corners = s + np.cumsum([0, rise, hold, fall])
    return follow(list(zip(corners, [db - depth_db, db, db, db - depth_db])))


def hump(t, rise):
    """An envelope that swells for rise seconds and dies about as fast."""
    return t / rise * np.exp(-(t / rise) ** 2 / 2)


def steadied(x):
    """Takes out slow swells and leaves the grain."""
    return x / np.sqrt(abs(uniform_filter1d(x ** 2, size=2200)) + 1e-9)


def evened(x):
    """Scales to rms 1."""
    return x / np.sqrt(np.mean(x ** 2) + 1e-20)


def peaked(x):
    """Scales the loudest three milliseconds to rms 1."""
    return x / np.sqrt(uniform_filter1d(x ** 2, size=132, mode="constant").max() + 1e-20)


def amp(db):
    """Decibels to gain."""
    return 10 ** (np.asarray(db) / 20)


def seconds(length):
    """A time axis."""
    return np.arange(int(length * SR)) / SR


def read(points, hz):
    """Reads a curve on a log-frequency axis."""
    f, value = np.transpose(points)
    return np.interp(np.log(hz + 1), np.log(f + 1), value)


def add(mix, s, sound):
    """Mixes a sound in at time s."""
    part = mix[max(round(s * SR), 0):][:len(sound)]
    part += sound[:len(part)]


def scene():
    """From the microphones the sink is far off, the bottle to the left, the pan straight ahead."""
    return (appliance()
            + kitchen(tap(), lag_ms=0.26, left_db=3, early_db=8.5, tail_db=-1.5)
            + kitchen(filling(), lag_ms=0.25, left_db=2.5, early_db=6, tail_db=2.5, near_db=4, hop=2400)
            + kitchen(shaking(), lag_ms=0.45, left_db=3.5, early_db=5.5, tail_db=-3, near_db=0.5)
            + kitchen(gulping(), lag_ms=0.37, left_db=4.5, early_db=6, tail_db=-8)
            + kitchen(dripping(), lag_ms=0.17, left_db=4.5, early_db=5.5, tail_db=-0.5)
            + kitchen(pouring(), lag_ms=0.04, left_db=-0.1, early_db=-1, tail_db=-8, near_db=-9.5)
            + kitchen(knocking() + rubbing(), lag_ms=0.4, left_db=3.5, early_db=3, tail_db=-4.5)
            + kitchen(ticks(), lag_ms=0.3, left_db=6.5, early_db=-3, tail_db=-3)
            + kitchen(whisking(), lag_ms=0, left_db=0.5, early_db=0, tail_db=1, near_db=4)
            + kitchen(sloshing(), lag_ms=0, left_db=4, early_db=0, tail_db=-12)
            + kitchen(bumps(), lag_ms=0, left_db=1, early_db=-4, tail_db=-2))


def record(dry):
    """The microphones shed the deepest bass, and the top of the treble is cut off steeply."""
    low_cut_hz, edge_hz = 45, 16050
    trimmed = signal.lfilter(*signal.butter(2, low_cut_hz, "high", fs=SR), dry)
    band_limit = signal.firwin(511, edge_hz, window=("kaiser", 9), fs=SR)
    return signal.oaconvolve(trimmed, band_limit[None], "same")


dry = scene()
out = record(dry)
master_out(out)
```